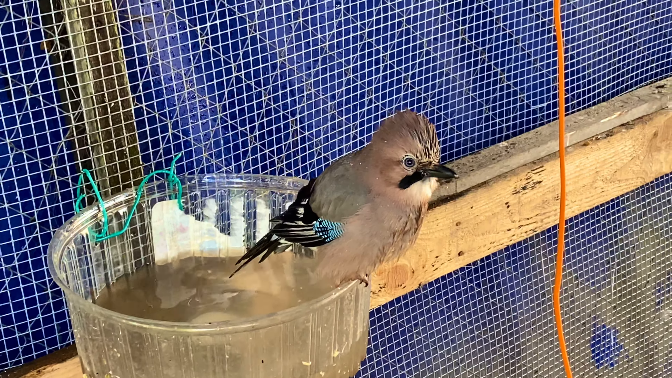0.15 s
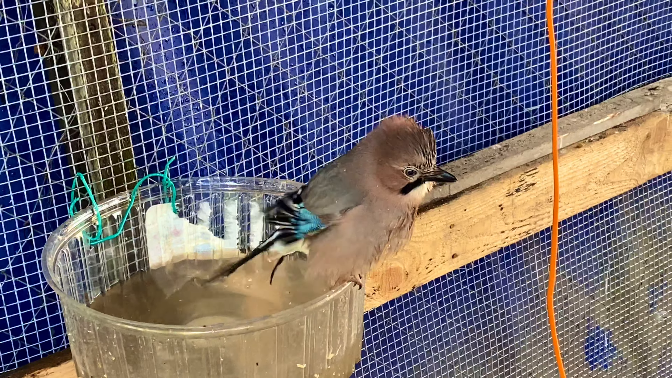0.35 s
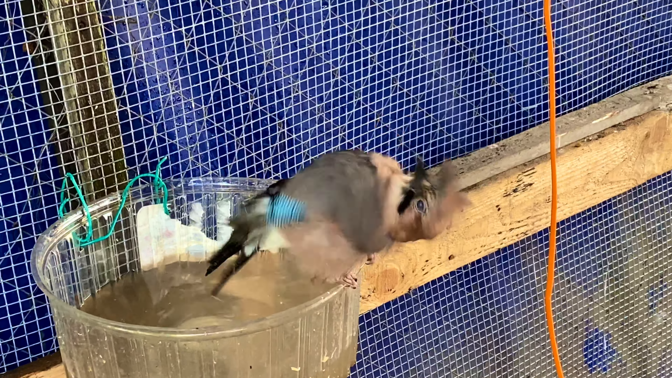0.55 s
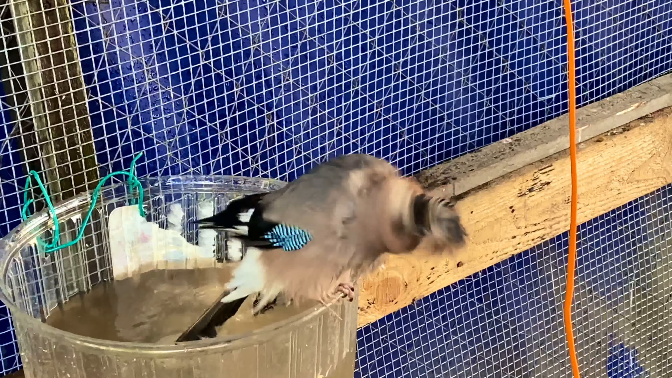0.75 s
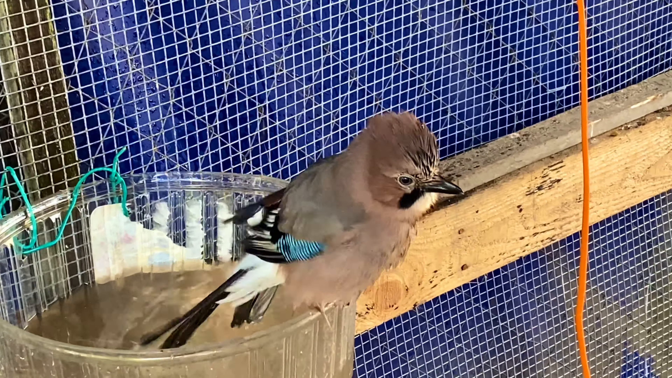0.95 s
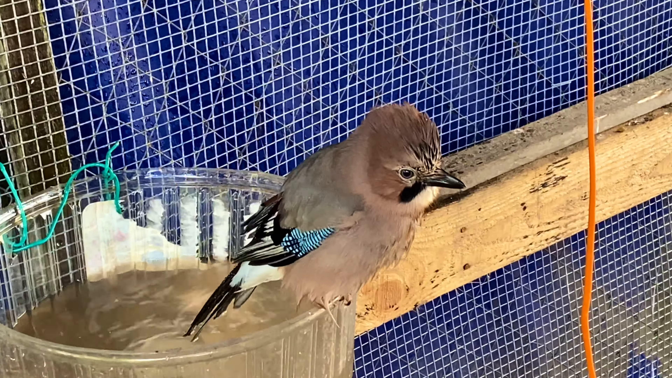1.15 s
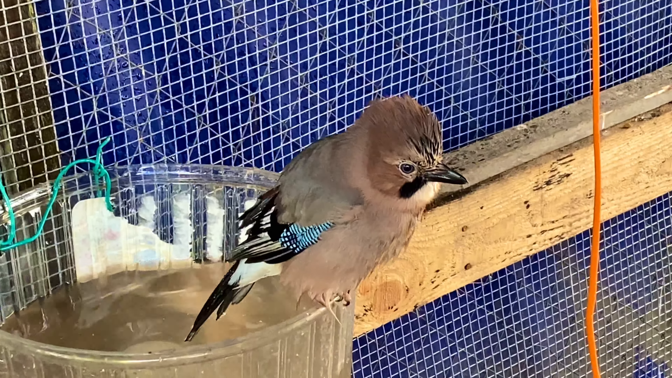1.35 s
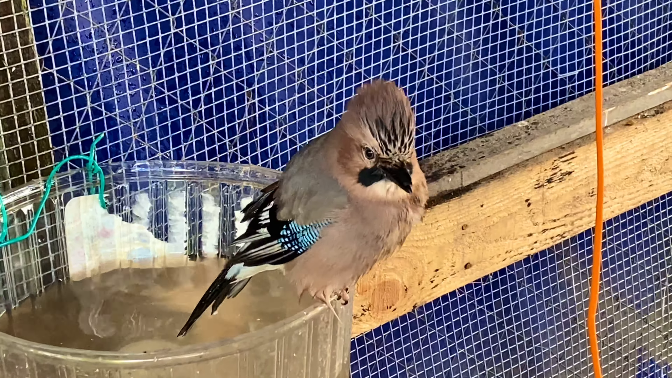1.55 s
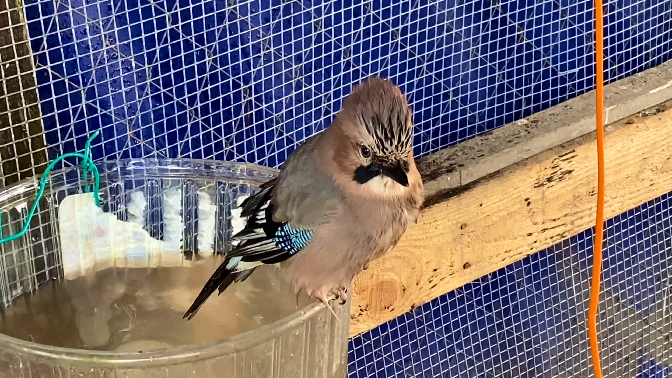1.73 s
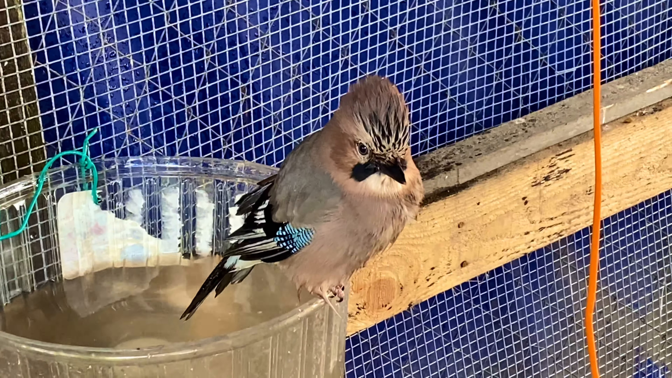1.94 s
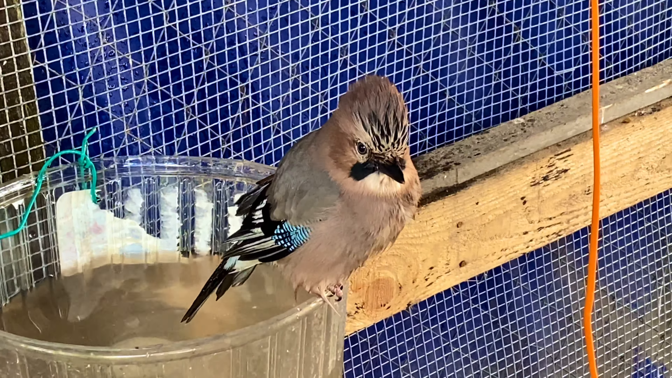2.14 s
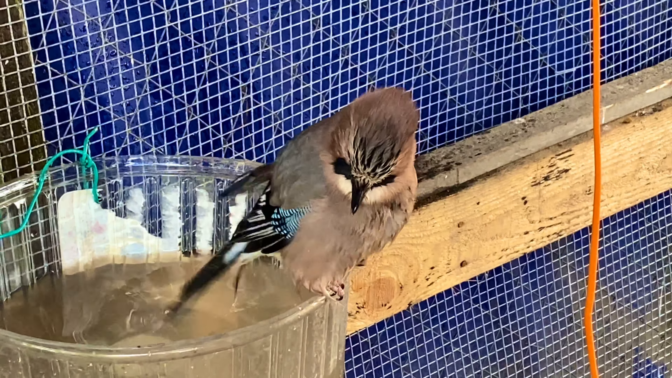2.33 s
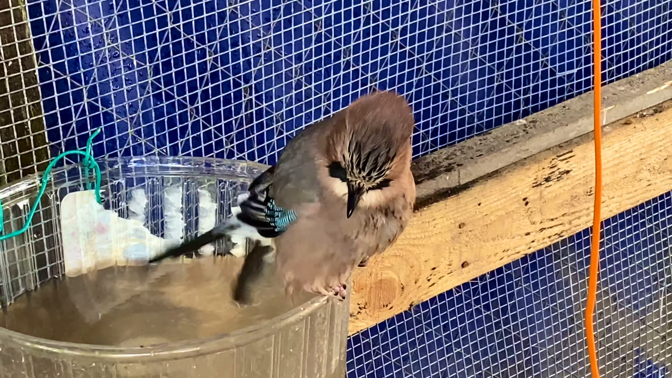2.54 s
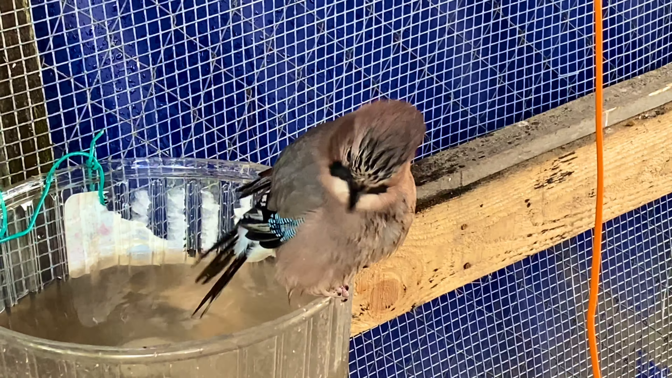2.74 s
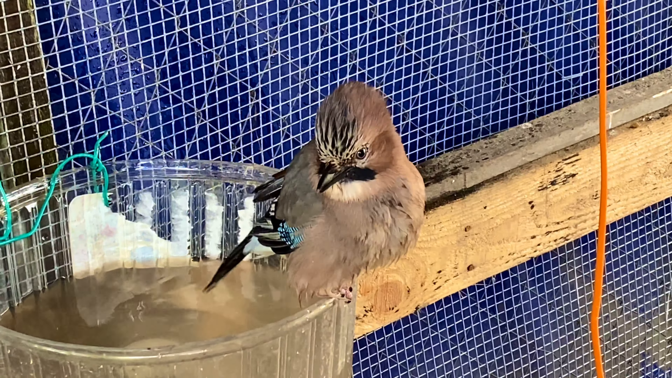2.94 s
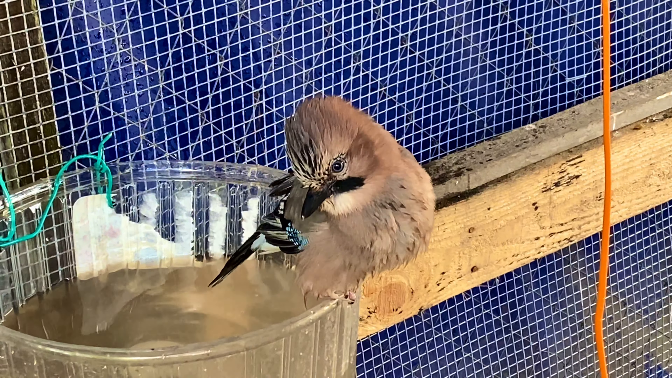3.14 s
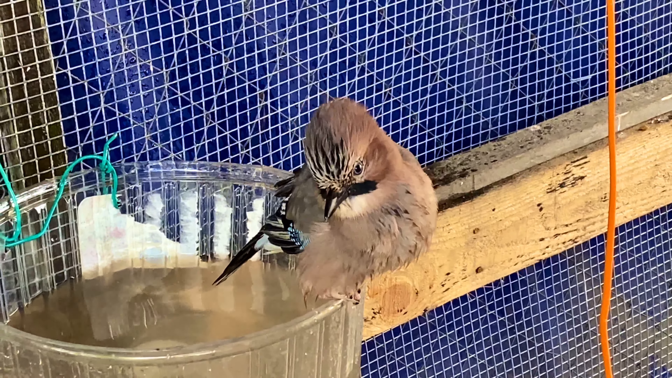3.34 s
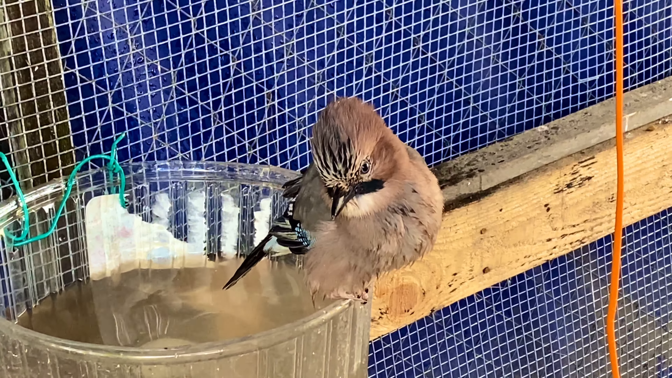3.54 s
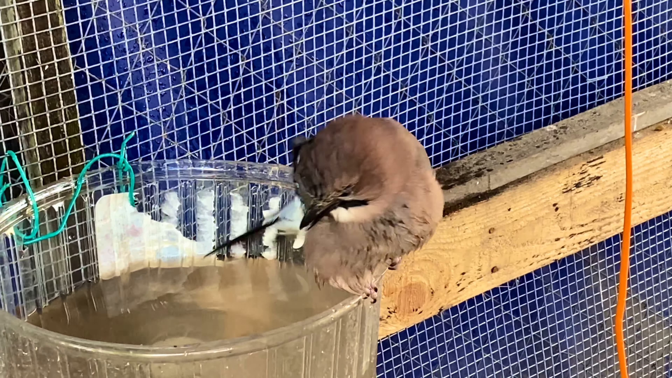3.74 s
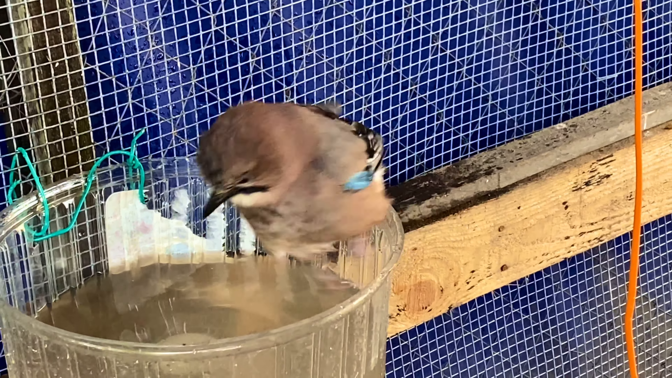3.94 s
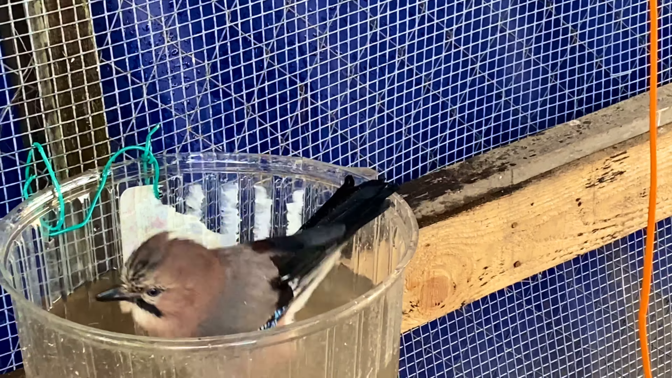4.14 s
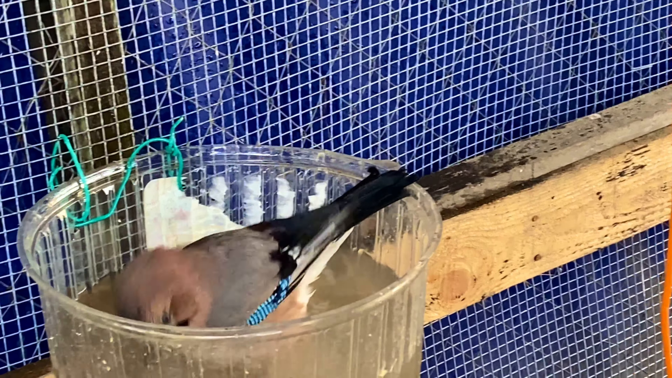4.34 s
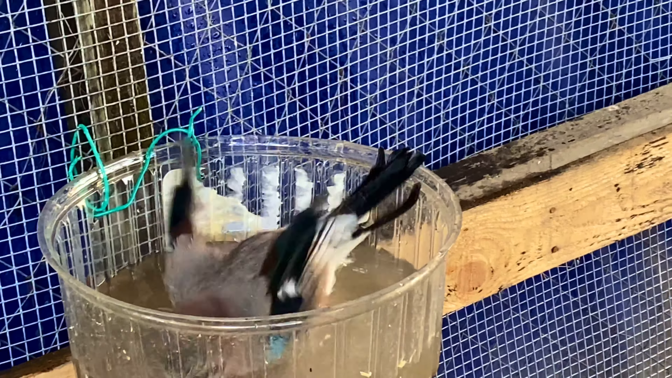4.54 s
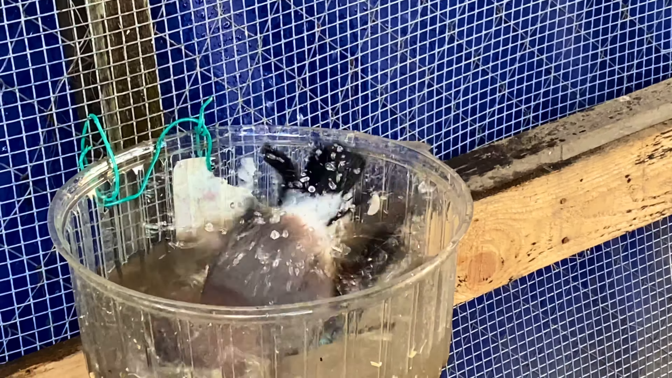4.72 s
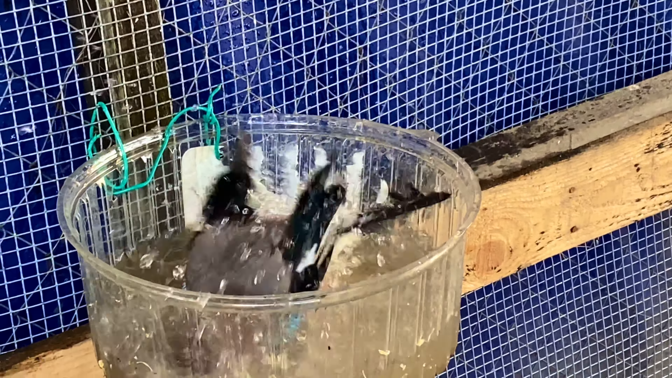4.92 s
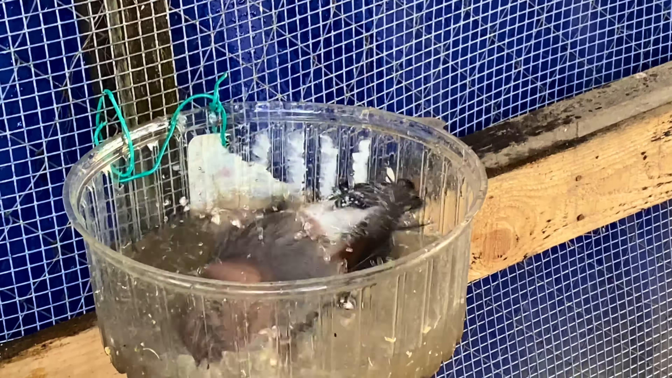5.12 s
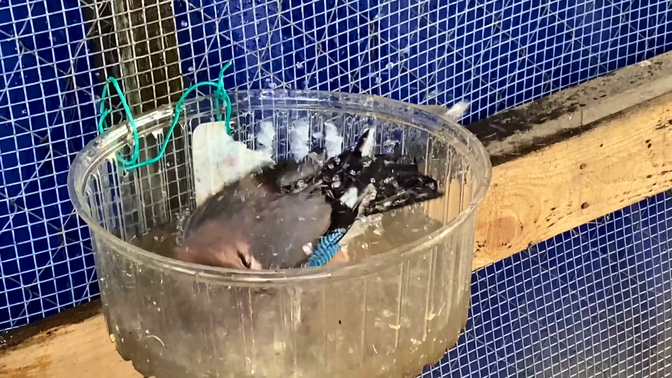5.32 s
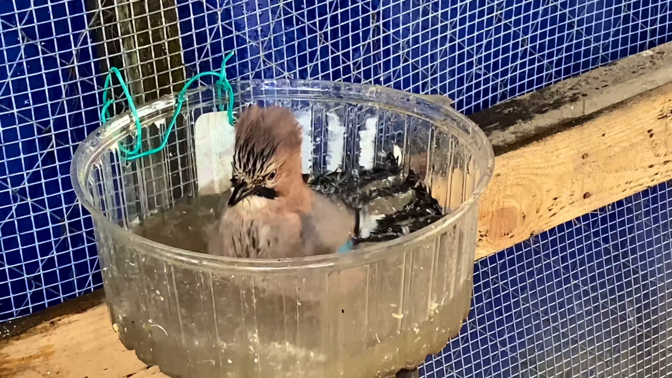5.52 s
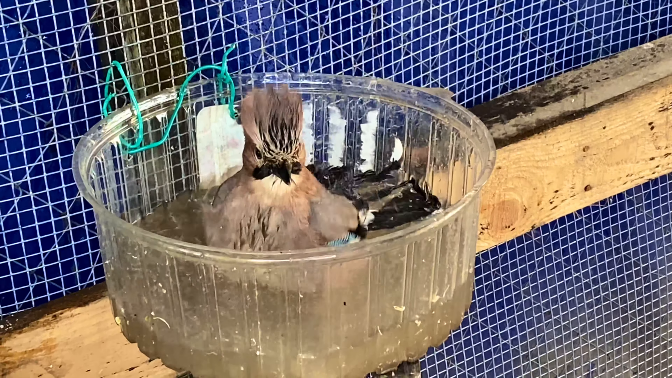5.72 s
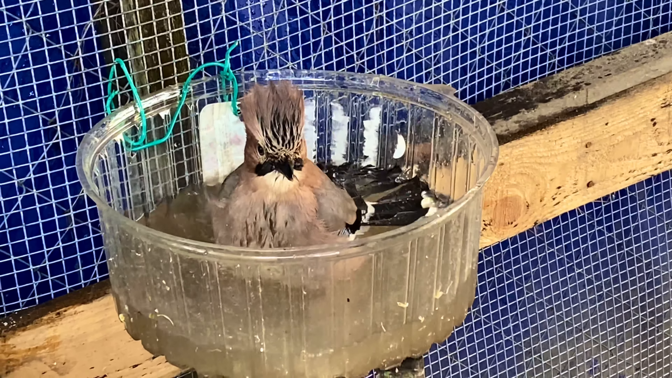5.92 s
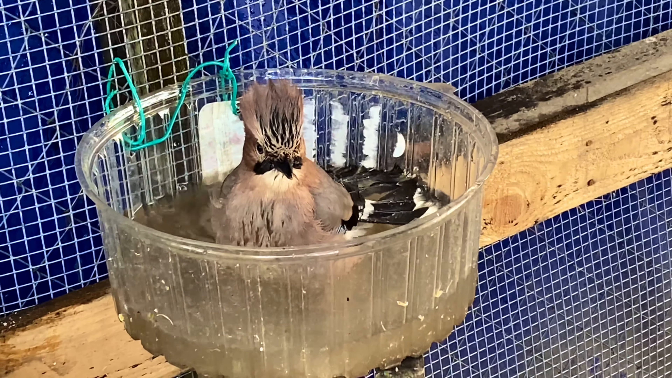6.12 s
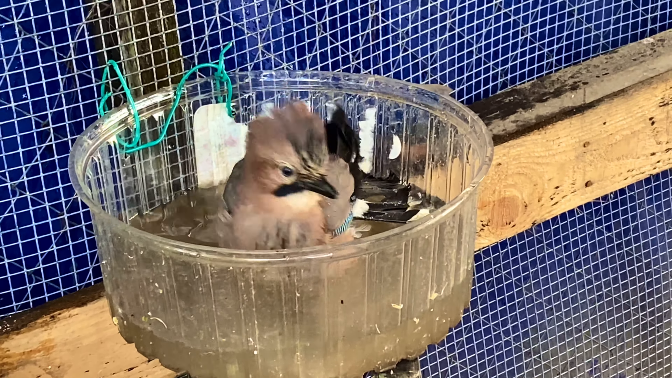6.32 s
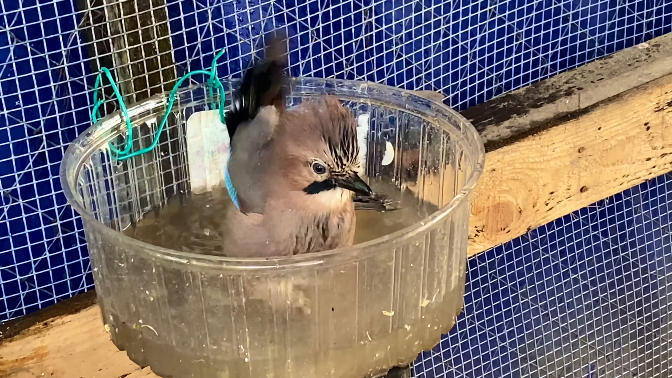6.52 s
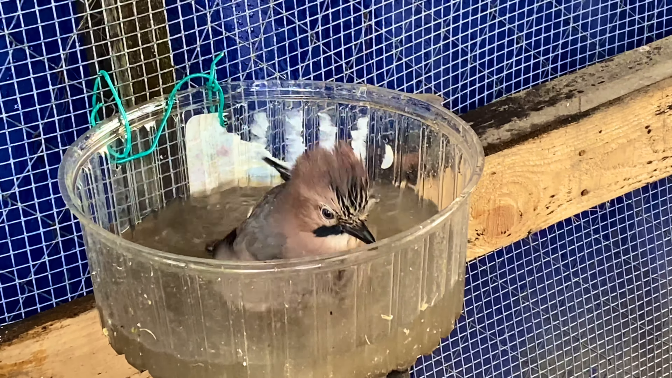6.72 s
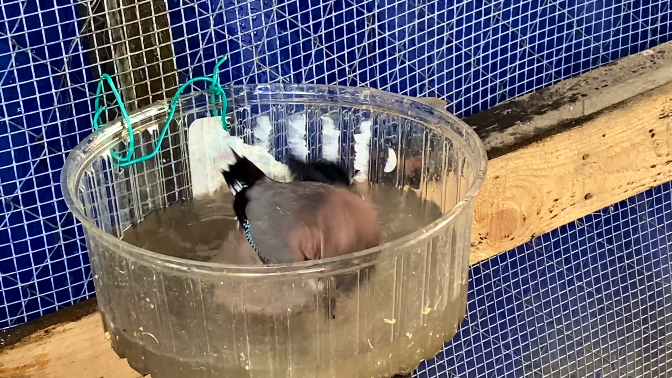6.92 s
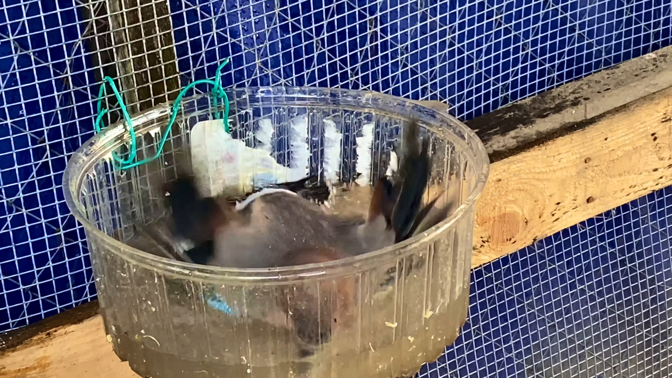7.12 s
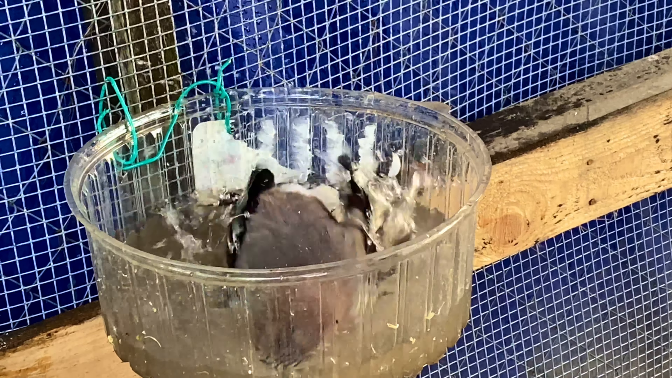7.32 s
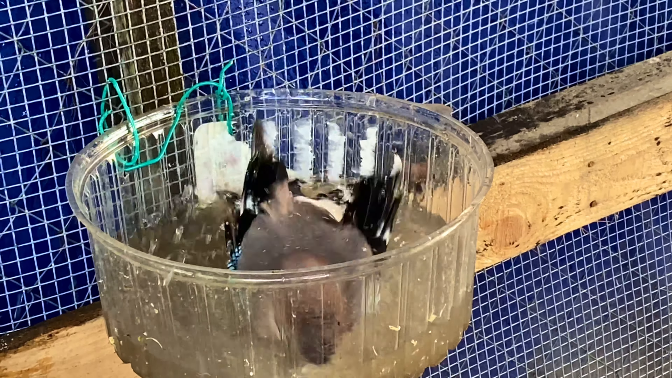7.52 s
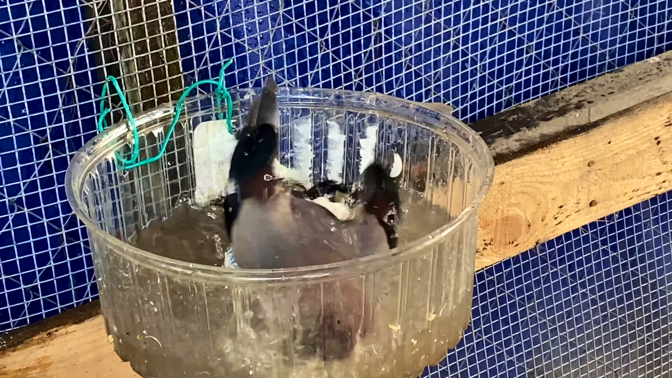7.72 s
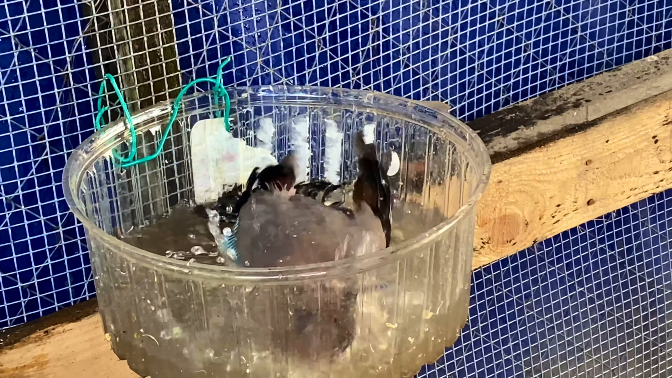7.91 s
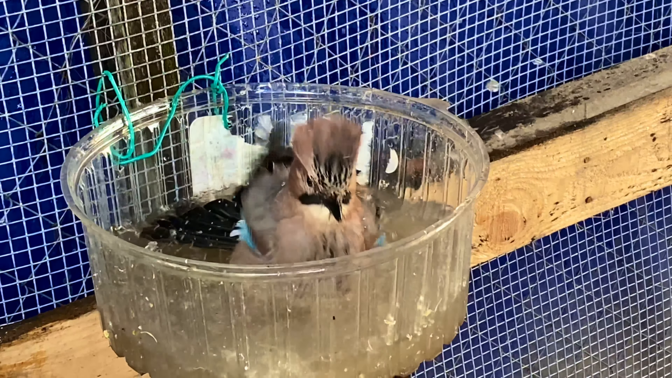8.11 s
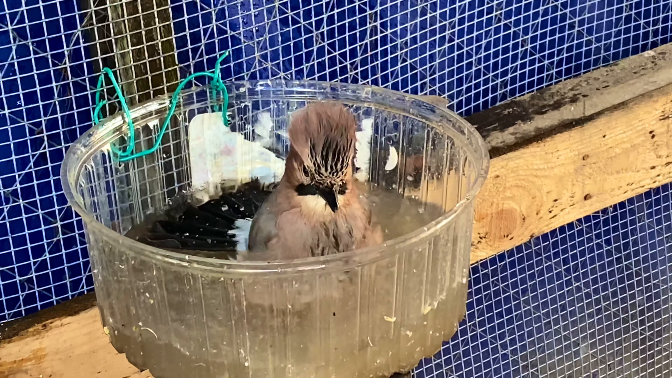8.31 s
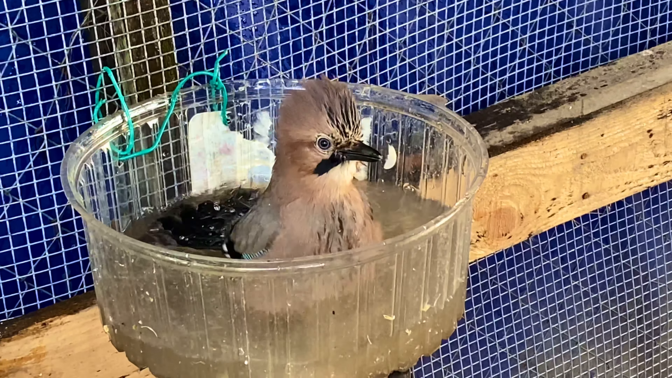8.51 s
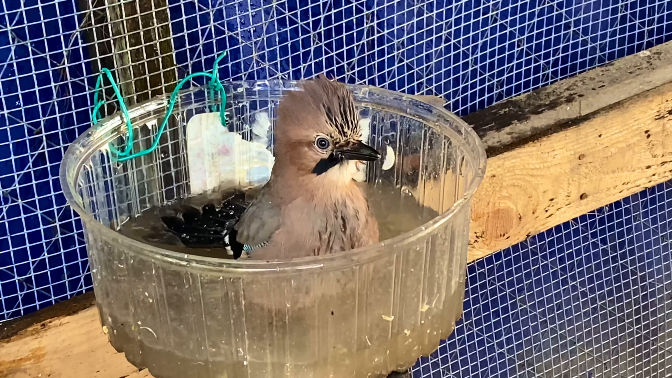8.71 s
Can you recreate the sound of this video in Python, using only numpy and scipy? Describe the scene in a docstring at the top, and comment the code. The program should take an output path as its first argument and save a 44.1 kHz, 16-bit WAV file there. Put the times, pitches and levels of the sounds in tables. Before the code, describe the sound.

A low, distant town rumble and a faint hum run throughout. At about 0.4 seconds a bird close by shakes itself on the rim of a thin plastic tub: a sharp wet flick, a soft thump, spray and a few hollow plops. From 1.2 to 3.7 seconds it quietly ruffles its feathers, with stray drips. A faint airy whine passes between 1.6 and 2.9 seconds. Small birds call faintly far off around 3, 4.5 and 6 to 6.7 seconds. Near 4 seconds the bird hops in with a plop, then beats the water with its wings from 4.5 to 5.9 seconds, loudest near 5: spray hisses, drops snap, bubbles gurgle and the tub wall booms softly. After a short pause and a brief splash at 6.5 seconds, a second bout runs from 7.1 seconds, dying away in drips by 8.7.

```python
"""Town rumble and a low drone run throughout. At 0.3 s a bird shakes itself on the rim of a thin plastic tub:
spray hisses, drops snap and ring as bubbles, air pockets plop, the wall booms. It sits and ruffles its
feathers; an airy whine passes from 1.6 to 2.9 s, then small birds start calling far off. Near 4 s it stirs
again, hops in and beats the water with its wings, in bouts until 8.7 s."""
import sys
import numpy as np
from scipy import signal
from scipy.fft import rfft, irfft
from scipy.io import wavfile

SR = 44100
rng = np.random.default_rng(int(sys.argv[2]) if len(sys.argv) > 2 else 0)


def pcm_store(signal):
    """Save signal as 16-bit PCM."""
    levels = np.round(np.clip(np.atleast_2d(signal), -1, 1) * 32767)
    wavfile.write(sys.argv[1], SR, levels.astype(np.int16).T)


N = 390726

# Drops, feather flicks, wing slaps. Each row: start in seconds, level in dB, bubble pitch in Hz,
# crack offset in dB.
WATER_HITS = [(0.401, -56, 6840, -10), (0.5672, -22, 1820, -20.5), (0.648, -39.5, 1510, -29),
              (0.747, -49.5, 6740, -29), (.8346, -71, 2030, 3), (0.845, -41.5, 5660, -11),
              (0.9, -60.5, 1720, 3.5), (.948, -55.5, 7240, -5), (0.9786, -57.5, 1870, 3.5),
              (1.635, -47.5, 1590, -38), (1.6784, -52, 3580, -13), (1.819, -58, 2090, -28),
              (2.2932, -56, 1720, -3.5), (2.584, -49, 1750, -25), (3.4966, -50, 2380, -5.5),
              (3.912, -58.5, 1620, 1), (3.987, -40, 1490, -9.5), (4.0844, -55.5, 1650, -19),
              (4.1026, -50, 7190, -6), (4.126, -39.5, 2200, -8.5), (4.1934, -40, 2460, -9.5),
              (4.248, -59, 2200, -10), (4.6186, -42, 6800, -11), (4.6508, -36, 6130, -7),
              (4.6853, -46, 7600, -3), (4.708, -42.5, 1840, -14), (4.778, -51.5, 2340, 3),
              (4.7936, -38.5, 1380, -6), (4.825, -35.5, 2960, -9.5), (4.9222, -37, 1630, -3),
              (4.974, -44, 7200, 3), (4.985, -41.5, 4700, 1), (5.0527, -29.5, 4350, -7),
              (5.056, -21.5, 1500, -24), (5.0993, -28, 1970, -22), (5.197, -36.5, 1580, -6),
              (5.241, -29, 3490, -11), (5.3096, -48, 1420, 2), (5.3685, -50, 2030, -2.5),
              (5.466, -41.5, 1990, -13), (5.545, -53, 4100, -4), (5.56, -38, 1730, -4),
              (5.6519, -33.5, 1740, -8.5), (5.7387, -53, 1400, -5), (5.754, -45, 2000, -2.5),
              (5.9199, -55.5, 7190, 5), (6.153, -48, 7450, -18), (6.44, -58.5, 1400, 1.5),
              (6.517, -52, 3500, -21), (6.618, -43.5, 1570, -22), (6.637, -40, 2070, -20),
              (6.6574, -36, 5800, -26), (6.76, -50, 1670, -7), (6.782, -50.5, 2780, -1),
              (7.0754, -43.5, 1400, -13), (7.161, -39, 900, -34), (7.22, -48, 2640, -7),
              (7.2352, -26, 1450, -20.5), (7.257, -23, 1330, -23), (7.3063, -42, 1770, -10),
              (7.354, -27, 3740, -28), (7.3828, -44, 1710, 2), (7.4026, -37.5, 6650, -19),
              (7.42, -36, 1830, -6.5), (7.484, -39, 2410, -12), (7.523, -28.5, 1480, -21),
              (7.5522, -42.5, 6030, -1.5), (7.5772, -35, 1470, -9), (7.5953, -41, 4240, 2),
              (7.648, -29, 1890, -11.5), (7.6847, -36, 2430, -7.5), (7.722, -40, 3080, -2),
              (7.7711, -32.5, 3670, -4.5), (7.81, -24.5, 1606, -18.5), (7.8721, -34, 1670, -5.5),
              (7.943, -36.5, 5850, -8), (8.001, -41.5, 7450, -0.5), (8.0607, -41.5, 1750, -4.5),
              (8.085, -38.5, 6220, -5), (8.1145, -36.5, 3540, -6), (8.1835, -44, 1830, -12),
              (8.2001, -40, 1540, -8.5), (8.2283, -42, 2200, -18), (8.2814, -49.5, 7550, -7),
              (8.3965, -48, 1920, -4.5), (8.546, -49.5, 1920, -5)]
# Air pockets in the tub. Each row: start in seconds, level in dB, pitch in Hz, t60 in seconds.
AIR_POCKETS = [(0.505, -53, 297, 0.1), (0.572, -46, 523, 0.12), (0.806, -40.5, 420, 0.1),
               (0.825, -41, 336, 0.22), (0.87, -50, 290, 0.23), (4.145, -31.5, 329.5, 0.087),
               (4.694, -46.5, 468, 0.17), (4.81, -47, 572, 0.16), (4.859, -43, 309, 0.14),
               (4.959, -42, 277, 0.13), (5.063, -28.5, 347.6, 0.16), (5.13, -29, 405, 0.069),
               (5.145, -36.5, 252.5, 0.25), (5.431, -41.5, 305, 0.087), (6.333, -45, 390, 0.068),
               (6.648, -45, 359, 0.38), (7.238, -40, 382, 0.11), (7.253, -35.5, 363.4, 0.17),
               (7.41, -43, 287, 0.12), (7.455, -39.5, 344, 0.2), (7.524, -39, 336, 0.14),
               (7.583, -37.5, 318, 0.25), (7.744, -47, 257, 0.13), (7.813, -30.5, 336, 0.13),
               (7.955, -46.5, 258, 0.22), (8.049, -44.5, 332, 0.13), (8.125, -53, 610, 0.13)]


def amp(db):
    return 10 ** (np.asarray(db) / 20)


def unit_rms(x):
    return x / np.sqrt(np.mean(x ** 2) + 1e-20)


def add_at(out, start_s, sound):
    at = round(start_s * SR)
    out[at:at + len(sound)] += sound[:N - at]


def fade(t, rise_s, t60_s):
    return (1 - np.exp(-t / rise_s)) * 1000 ** (-t / t60_s)


def glide(t, hz, rise_per_s):
    """Sine whose pitch moves by a share of hz each second."""
    return np.sin(2 * np.pi * hz * (t + rise_per_s * t ** 2 / 2))


def level_curve_db(points):
    times_s, db = np.transpose(points)
    return np.interp(np.arange(N) / SR, times_s, db, left=-200, right=-200)


def at_hz(points, hz):
    points_hz, values = np.transpose(points)
    return np.interp(np.log(np.maximum(hz, 1)), np.log(points_hz), values)


def drift(rate_hz):
    """Slow random wander, rms 1."""
    step = 40
    r = np.exp(-2 * np.pi * rate_hz * step / SR)
    slow = signal.lfilter([1], [1, -2 * r, r * r], rng.standard_normal(N // step + 2002))[2000:]
    return np.interp(np.arange(N) / step, np.arange(len(slow)), unit_rms(slow))


def bandpass(x, low_hz, high_hz):
    return signal.sosfilt(signal.butter(2, [low_hz, high_hz], "band", fs=SR, output="sos"), x)


def resonance(x, hz, width_hz):
    r = np.exp(-np.pi * width_hz / SR)
    return signal.lfilter([1, 0, -1], [1, -2 * r * np.cos(2 * np.pi * hz / SR), r * r], x)


def ring(clicks, hz, t60_s):
    """Each click starts a decaying sine of its own height."""
    r = 1000 ** (-1 / (t60_s * SR))
    w = 2 * np.pi * hz / SR
    return signal.lfilter([0, np.sin(w)], [1, -2 * r * np.cos(w), r * r], clicks + 1e-18)


def coloured(x, spectrum):
    gain = amp(at_hz(spectrum, np.fft.rfftfreq(N, 1 / SR)))
    return unit_rms(irfft(rfft(x) * gain, N))


def grains(per_s, spread_db):
    """Random clicks of uneven size."""
    sizes = amp(spread_db * np.minimum(rng.exponential(1, N), 5)) * rng.choice([-1, 1], N)
    return sizes * (rng.random(N) < per_s / SR)


def town():
    """Far rumble: half-octave bands of stereo noise, each wavering by itself."""
    # Each row: frequency in Hz, relative density in dB.
    spectrum = [(15, -50), (25, -1.5), (76, 1.5), (153, -10.5), (293, -10), (354, -14.5), (575, -18),
                (775, -14), (1290, -23), (2990, -55.5), (7110, -52), (8590, -58), (11000, -53.5),
                (13600, -64), (16000, -76)]
    # Each row: frequency in Hz, left-right correlation.
    correlation = [(60, 0.98), (150, 0.87), (380, 0.61), (950, 0.0079), (2380, 1), (5980, 0.55),
                   (15000, 0.19)]
    # Each row: frequency in Hz, left minus right in dB.
    balance = [(60, -2), (380, -1.0), (2380, -0.5), (15000, 1)]
    edges_hz = 22 * 2 ** np.arange(0, 9.6, 0.5)
    white = rng.standard_normal((2, 2, N))  # neighbouring bands get unrelated noise
    out = 0
    for k, (low_hz, high_hz) in enumerate(zip(edges_hz, edges_hz[1:])):
        mid, side = bandpass(coloured(white[k % 2], spectrum), low_hz, high_hz)
        centre_hz = np.sqrt(low_hz * high_hz)
        alike = at_hz(correlation, centre_hz)
        left_db = at_hz(balance, centre_hz) / 2
        pair = np.sqrt(1 + alike) * mid + np.sqrt(1 - alike) * side * [[1], [-1]]
        out += amp(1.07 * drift(2.23)) * pair * amp([[left_db], [-left_db]])
    return amp(-54.5) * unit_rms(out)


def drone():
    """Low wavering hum: noise in one narrow resonance."""
    return amp(-65) * unit_rms(resonance(rng.standard_normal(N), hz=94, width_hz=12.2))


def spray():
    """Fine droplets crackle over a hiss; gusts are part shared, part per band."""
    # Each row: frequency in Hz, relative density in dB.
    spectrum = [(900, -41), (1500, -3.5), (2500, -2), (4000, -4), (6500, -7), (8500, -9.5), (10500, -5),
                (12500, -18), (14000, -25), (15700, -17)]
    white = rng.standard_normal(N)
    crackle = amp(-5.5) * unit_rms(grains(800, spread_db=5))
    hiss = coloured(white + crackle, spectrum)
    gust_db = 2.5 * drift(35)
    edges_hz = [800, 1600, 2600, 4000, 6200, 9500, 18000]
    out = 0
    for low_hz, high_hz in zip(edges_hz, edges_hz[1:]):
        out += amp(gust_db + 1.84 * drift(25)) * bandpass(hiss, low_hz, high_hz)
    return amp(0.5) * unit_rms(out)


def bubbles(per_s, low_hz, high_hz, t60_cycles, spread_db):
    """Bubbles born at random ring at pitches spread evenly in octaves; rms 1."""
    births = grains(per_s, spread_db)
    pitch_index = rng.integers(0, 20, N)
    out = 0
    for k, hz in enumerate(np.geomspace(low_hz, high_hz, 20)):
        out += ring(births * (pitch_index == k), hz, t60_cycles / hz)
    return unit_rms(out)


def sloshing():
    """Bubbles in stirred water: dense gurgle, sparse plinks, deeper glugs."""
    gurgle_db = -6 + 4.42 * drift(20.6)
    gurgle = bubbles(1800, low_hz=460, high_hz=2066, t60_cycles=20.7, spread_db=2.5)
    plinks = bubbles(150, low_hz=1400, high_hz=6500, t60_cycles=45, spread_db=4)
    glugs_db = -7.5 + 3.05 * drift(11.2)
    glugs = bubbles(500, low_hz=420, high_hz=947, t60_cycles=10.5, spread_db=3)
    return amp(gurgle_db) * gurgle + amp(-13) * plinks + amp(glugs_db) * glugs


def tub_wall():
    """Water shoves the thin wall and its modes boom."""
    # Each row: frequency in Hz, relative level in dB, t60 in seconds.
    modes = [(258, 4.5, 0.066), (336, 1.5, 0.15), (392.6, -4.5, 0.17), (578, -12, 0.18), (695, -11, 0.056),
             (960, -24, 0.037)]
    shoves = grains(200, spread_db=1)
    boom = sum(amp(db) * ring(shoves, hz, t60_s) for hz, db, t60_s in modes)
    return amp(-6.5) * unit_rms(boom)


def water_hits():
    """Each hit: a rising bubble, a cluster of smaller ones, a bright snap and a puff of spray."""
    out, t = np.zeros(N), np.arange(8000) / SR
    for start_s, db, hz, crack_db in WATER_HITS:
        cluster_noise, crack_noise = rng.standard_normal((2, len(t)))
        bubble = glide(t, hz, rise_per_s=8.2) * fade(t, rise_s=0.0018, t60_s=0.03)
        cluster = unit_rms(resonance(cluster_noise, hz, 0.27 * hz)) * fade(t, 0.00027, 0.047)
        snap = fade(t, rise_s=0.000091, t60_s=0.0072)
        puff = amp(-8) * fade(t, rise_s=0.00042, t60_s=0.16)
        crack = unit_rms(bandpass(crack_noise, 2500, 13000)) * (snap + puff)
        hit = amp(-8.5) * bubble + amp(-9.5) * cluster + amp(crack_db + 1.5) * crack
        add_at(out, start_s, amp(db) * hit)
    return out


def aftermath(events, offset_db, rise_s, t60_s):
    """Gain that hits or plops leave behind: quick rise, then decay."""
    gain, t = np.zeros(N), np.arange(SR // 2) / SR
    for start_s, db, *_ in events:
        add_at(gain, start_s, amp(db + offset_db) * fade(t, rise_s, t60_s))
    return gain


def plops():
    """Air pockets ring low and sag in pitch."""
    out, t = np.zeros(N), np.arange(16000) / SR
    for start_s, db, hz, t60_s in AIR_POCKETS:
        add_at(out, start_s, amp(db) * glide(t, hz, rise_per_s=-0.78) * fade(t, 0.0021, t60_s))
    return out


def thumps():
    """The bird's weight jolts the tub."""
    # Each row: start in seconds, level in dB, pitch in Hz.
    jolts = [(0.509, -39, 90), (4.494, -42.5, 93)]
    out, t = np.zeros(N), np.arange(8000) / SR
    for start_s, db, hz in jolts:
        add_at(out, start_s, amp(db) * np.sin(2 * np.pi * hz * t) * fade(t, rise_s=0.0051, t60_s=0.1))
    return out


def ruffle_gain():
    """Hiss gain of ruffled feathers: starts at once, holds, dies fast."""
    # Each row: start in seconds, length in seconds, level in dB.
    ruffles = [(1.256, 0.083, -83), (1.634, 0.067, -67), (1.678, 0.17, -81), (1.807, 0.12, -62.5),
               (1.975, 0.052, -70), (2.09, 0.055, -72), (2.154, 0.12, -81), (2.279, 0.11, -72),
               (2.368, 0.13, -71.5), (2.465, 0.33, -70), (2.882, 0.037, -70.5), (2.967, 0.039, -71),
               (3.123, 0.032, -68), (3.367, 0.11, -68.5), (3.45, 0.12, -73), (3.57, 0.11, -89),
               (3.617, 0.088, -88), (5.98, 0.33, -82.5), (6.21, 0.064, -70.5), (6.31, 0.037, -84),
               (8.764, 0.073, -81.5)]
    gain, t = np.zeros(N), np.arange(SR // 2) / SR
    for start_s, length_s, db in ruffles:
        envelope = (1 - np.exp(-t / 0.0072)) * np.exp(-(t / length_s) ** 3.9)
        add_at(gain, start_s, amp(db) * envelope)
    return gain


def whine():
    """Unsteady air noise in a few narrow resonances."""
    # Each row: time in seconds, level in dB.
    swell = [(1.55, -92), (1.646, -66), (1.718, -76.5), (1.982, -58.5), (2.09, -68), (2.144, -57.5),
             (2.226, -67.5), (2.47, -53.5), (2.486, -59), (2.516, -54), (2.606, -61), (2.696, -54),
             (2.9, -87)]
    # Each row: centre in Hz, filter width in Hz, relative level in dB.
    resonances = [(1223, 78, 2), (1318, 38, -13), (1750, 130, -15.5), (2550, 330, -21)]
    air = rng.standard_normal(N)
    tone = 0
    for hz, width_hz, db in resonances:
        band = resonance(air, hz, width_hz)
        tone += amp(db) * unit_rms(resonance(band, hz, width_hz))
    return amp(level_curve_db(swell) + 2 * drift(27)) * tone


def far_birds():
    """Small birds' calls, smeared by echoes into ragged bands of noise."""
    # Each row: start in seconds, length in seconds, centre in Hz, filter width in Hz, level in dB.
    calls = [(2.714, 0.098, 6700, 1500, -68.5), (2.82, 0.13, 5770, 1500, -70),
             (2.888, 0.09, 6300, 1600, -72), (2.906, 0.079, 3620, 250, -71),
             (3.084, 0.096, 6500, 1210, -71), (4.368, .15, 7150, 150, -88), (4.446, 0.084, 5190, 200, -71),
             (4.523, 0.063, 3060, 250, -68), (5.882, 0.082, 6600, 1200, -66), (6, 0.075, 6700, 1500, -68.5),
             (6.076, 0.075, 6850, 1490, -64.5), (6.154, 0.064, 7200, 800, -74),
             (6.494, 0.083, 4000, 300, -68.5), (6.518, 0.11, 3220, 400, -63.5),
             (6.67, 0.03, 6000, 1500, -67)]
    out, t = np.zeros(N), np.arange(16000) / SR
    for start_s, length_s, hz, width_hz, db in calls:
        band = resonance(rng.standard_normal(len(t)), hz, width_hz)
        call = unit_rms(resonance(band, hz, 2.6 * width_hz))
        envelope = (1 - np.exp(-t / 0.0051)) * np.exp(-(t / length_s) ** 1.74)
        add_at(out, start_s, amp(db) * call * envelope)
    return amp(1.4 * drift(40)) * out


def pings():
    """Lone bubbles ring clear of the splash and climb as they die."""
    # Each row: start in seconds, level in dB, pitch in Hz, t60 in seconds.
    lone_bubbles = [(3.99, -49, 1560, 0.076), (4.196, -53, 2290, 0.13), (5.098, -39, 1960, .06),
                    (5.248, -39.5, 1330, .06), (7.428, -44, 1850, .04), (7.446, -43, 1540, .04),
                    (7.484, -43, 2440, 0.036), (7.649, -46, 1870, 0.043), (7.68, -47, 1950, .04),
                    (7.771, -38, 3830, .04), (7.88, -44, 1750, .05), (7.974, -45, 1655, 0.056),
                    (8.014, -45, 3000, .04), (8.171, -51, 1490, 0.064)]
    out, t = np.zeros(N), np.arange(8000) / SR
    for start_s, db, hz, t60_s in lone_bubbles:
        add_at(out, start_s, amp(db) * glide(t, hz, rise_per_s=3) * fade(t, 0.0012, t60_s))
    return out


def microphone_ports(x):
    """Two ports hear a sound with a phase gap; half the gap sets the strength of the side signal."""
    # Each row: frequency in Hz, side minus mid in dB.
    side_levels = [(100, -18), (330, -20.5), (600, -9.5), (1200, -4.5), (1800, -89), (2800, -13),
                   (5000, -9), (6200, -14.5), (7200, -25), (8300, 6), (9800, -6), (11000, -11), (12200, -5),
                   (13500, 34), (14500, 1), (16000, 8)]
    half_gap_rad = np.arctan(amp(at_hz(side_levels, np.fft.rfftfreq(N, 1 / SR))))
    turn = np.exp(1j * half_gap_rad)
    return irfft(rfft(x) * [turn, turn.conj()], N)


def echoes(x, t60_s=0.16, gap_s=0.0054):
    """Boards and sheeting throw back a short scatter, different on each side."""
    t = np.arange(SR // 4) / SR
    tail = rng.standard_normal((2, len(t))) * 1000 ** (-t / t60_s) * (t > gap_s)
    tail /= np.sqrt(np.sum(tail ** 2) / 2)
    return amp(-11.5) * signal.fftconvolve(x[None], tail, axes=1)[:, :N]


def scene():
    """The bird's stirring drives spray, slosh and wall; only the bath gets the near echoes."""
    # One list a bout of stirring. Each row: time in seconds, spray level in dB.
    bouts = [
        [(0.33, -91), (0.41, -73), (0.542, -78.5), (0.626, -63), (0.748, -68), (0.828, -71), (0.898, -78),
         (1.034, -68.5), (1.12, -92)],
        [(3.86, -88), (3.95, -76.5), (4.07, -79), (4.106, -69), (4.23, -74), (4.32, -99)],
        [(6.4, -86), (6.484, -62.5), (6.524, -85), (6.606, -79), (6.644, -64), (6.682, -70.5), (6.804, -83),
         (6.86, -84)],
        [(4.45, -90), (4.52, -67.5), (4.64, -63.5), (4.792, -56.5), (4.996, -52), (5.114, -51), (5.3, -65),
         (5.63, -62), (5.88, -73), (5.97, -78)],
        [(7.03, -79), (7.116, -66.5), (7.228, -66.5), (7.392, -55.5), (7.57, -58.5), (7.732, -60.5), (8.0, -58),
         (8.086, -62.5), (8.328, -69), (8.432, -78.5), (8.564, -70), (8.66, -97)],
    ]
    stir_db = np.max([level_curve_db(bout) for bout in bouts], axis=0)
    drive_db = stir_db + 60
    spray_gain = amp(stir_db) + ruffle_gain()
    spray_gain += aftermath(WATER_HITS, offset_db=-38.5, rise_s=0.011, t60_s=0.2)
    slosh_gain = amp(-58.5 + 0.77 * drive_db)
    slosh_gain += aftermath(WATER_HITS, offset_db=-21, rise_s=0.0013, t60_s=0.2)
    slosh_gain += aftermath(AIR_POCKETS, offset_db=-11, rise_s=0.002, t60_s=0.1)
    wall_gain = amp(-59 + 0.51 * drive_db)
    wall_gain += aftermath(AIR_POCKETS, offset_db=-5.5, rise_s=0.004, t60_s=0.32)
    bath = spray_gain * spray() + slosh_gain * sloshing() + wall_gain * tub_wall()
    bath += water_hits() + plops() + thumps() + pings()
    return microphone_ports(bath + whine() + far_birds()) + echoes(bath) + town() + drone()


def record(dry, low_hz=36, high_hz=16250):
    """Deep bass falls away, the top is cut."""
    body = signal.sosfilt(signal.butter(4, low_hz, "high", fs=SR, output="sos"), dry)
    return signal.sosfilt(signal.cheby2(24, 70, high_hz, fs=SR, output="sos"), body)


dry = scene()
out = record(dry)
pcm_store(out)
```